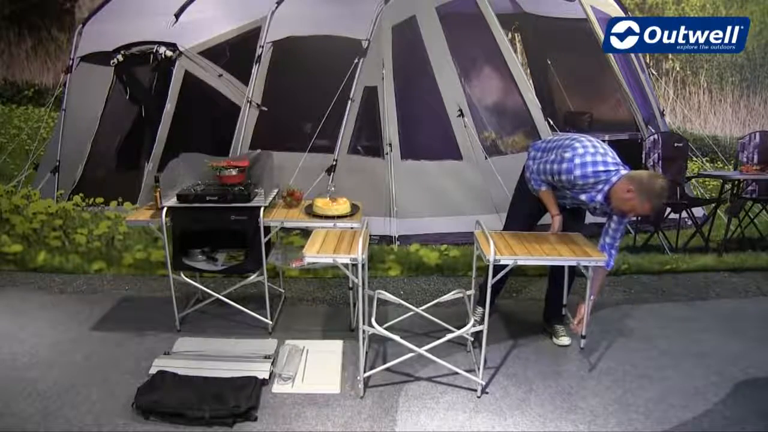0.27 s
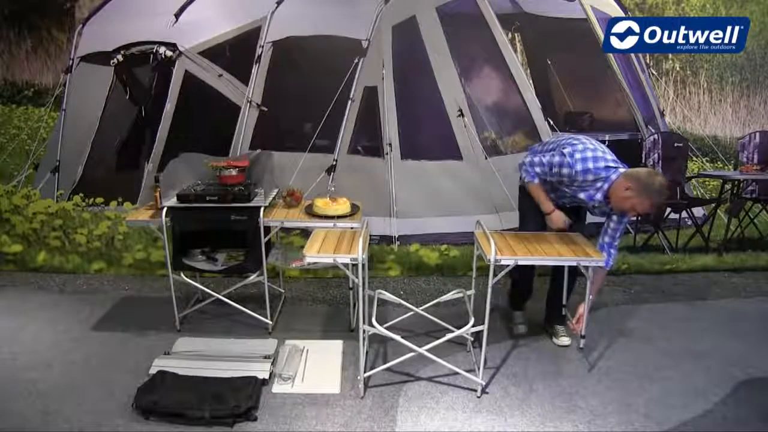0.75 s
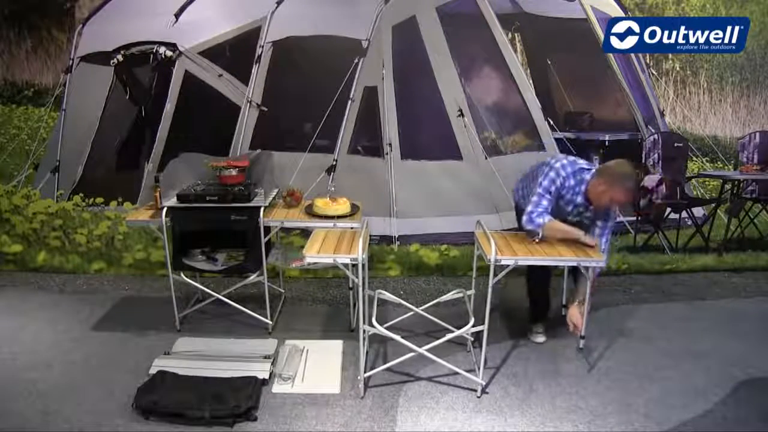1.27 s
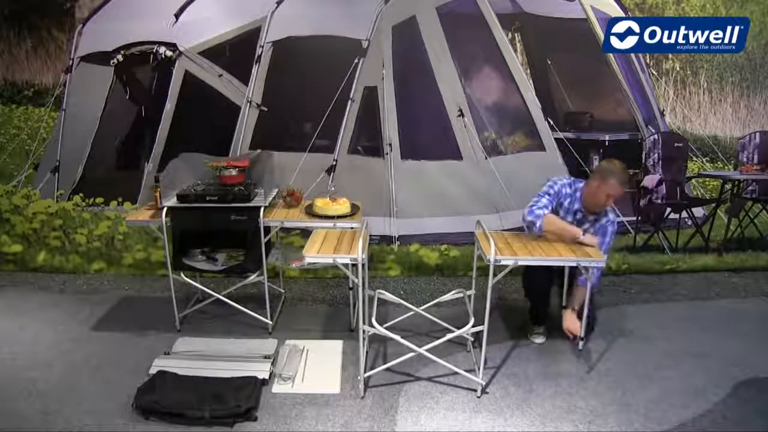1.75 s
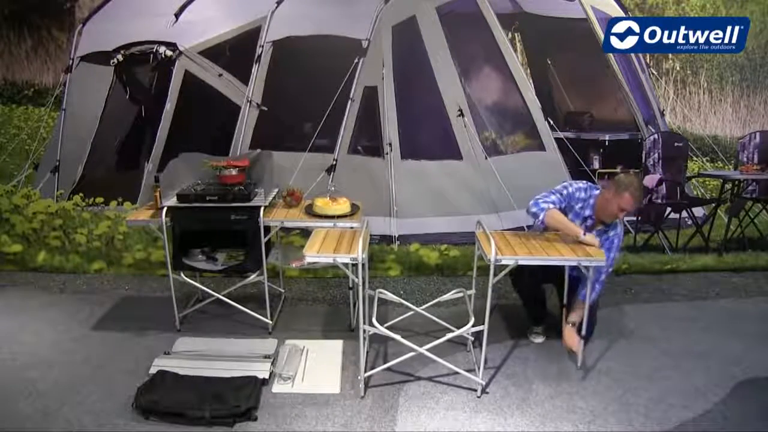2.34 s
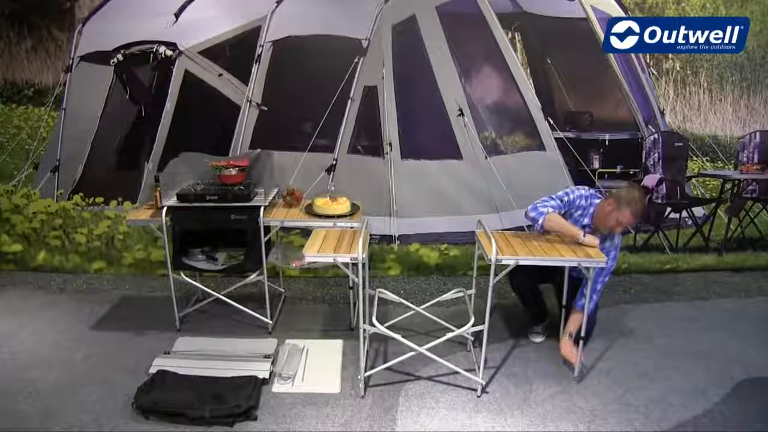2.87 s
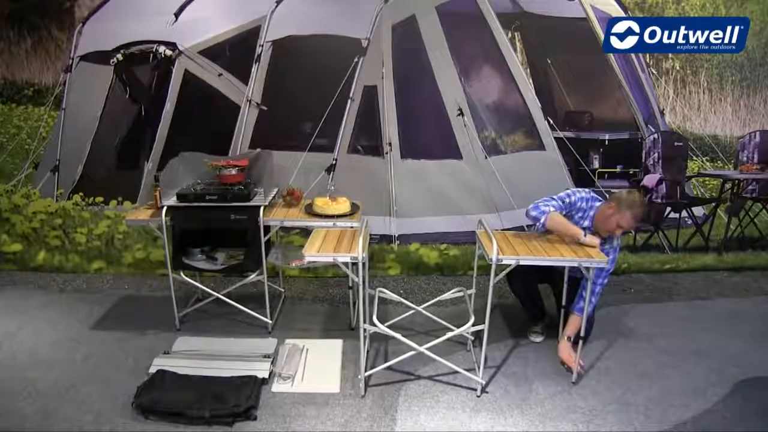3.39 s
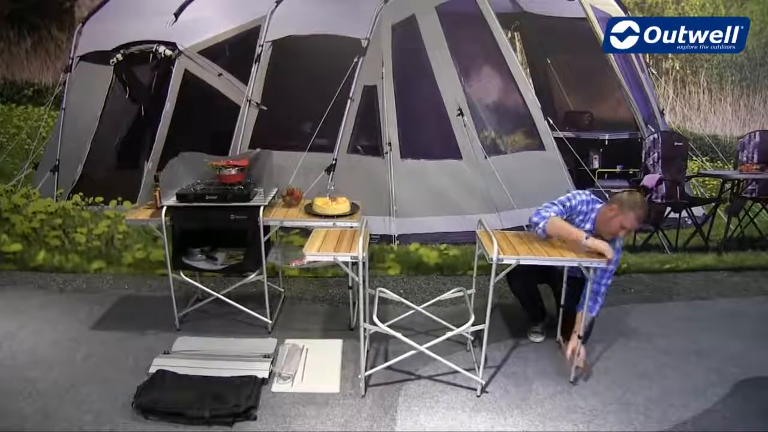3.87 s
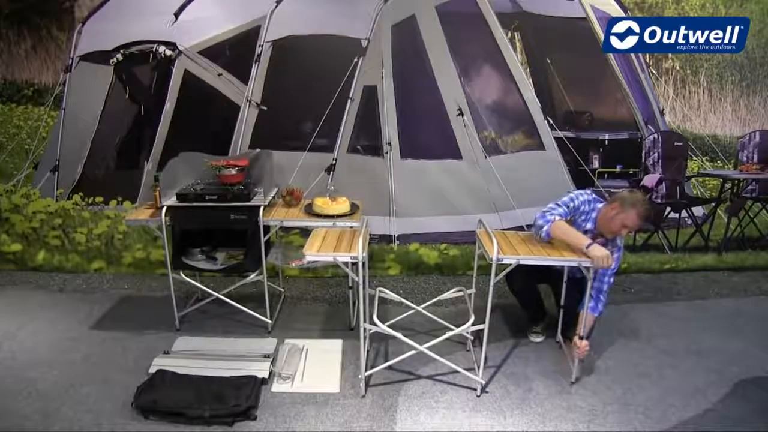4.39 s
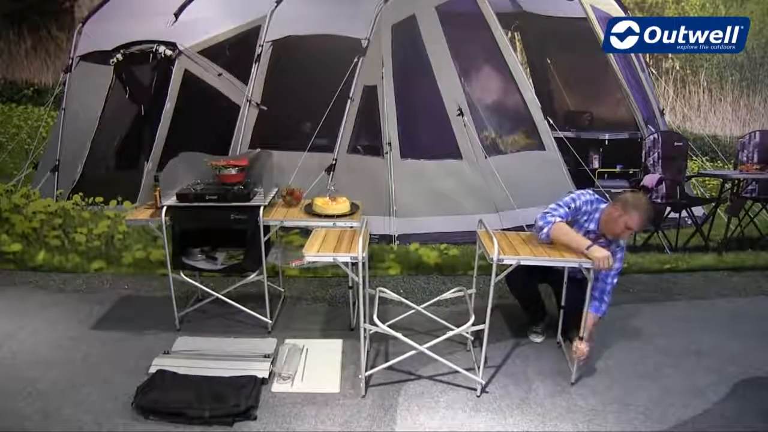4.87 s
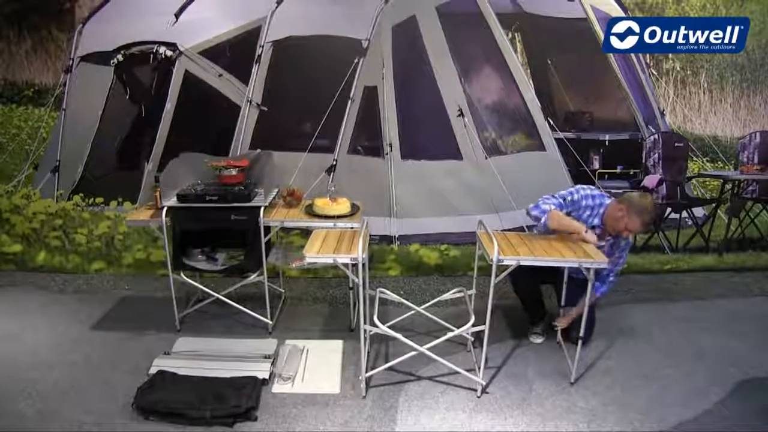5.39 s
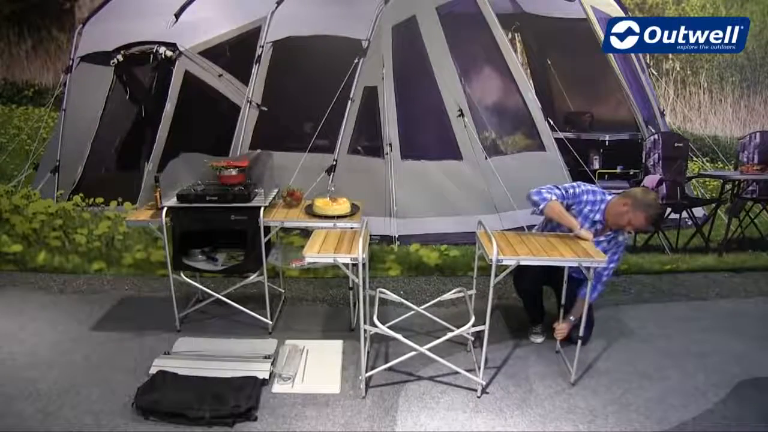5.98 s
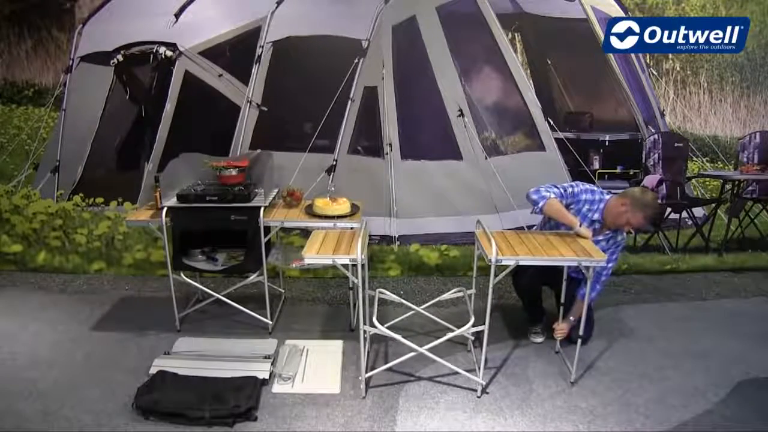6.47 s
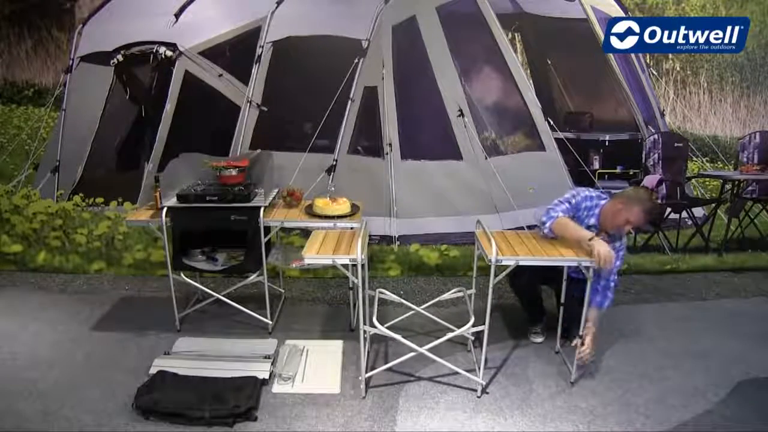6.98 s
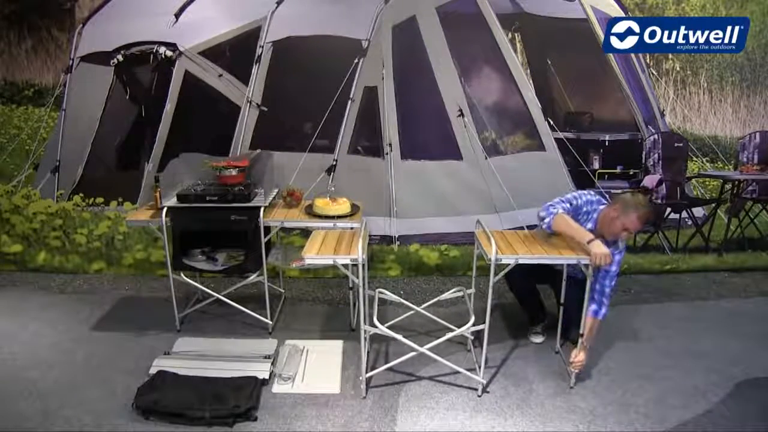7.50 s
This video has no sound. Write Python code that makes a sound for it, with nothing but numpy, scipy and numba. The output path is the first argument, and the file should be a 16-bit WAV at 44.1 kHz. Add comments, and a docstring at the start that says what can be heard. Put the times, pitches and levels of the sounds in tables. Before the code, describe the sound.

Aluminium table leg being pulled and locked: loose clicks, a tiny squeak, rough stick-slip scraping, dull knocks, faint cloth rustle over low room hush.

```python
"""A folding aluminium table in a small studio, over a steady hush and changing rustles of cloth and hands.
From the start its leg catches click and rattle: bursts of contact noise, each with a ring of the leg.
Before one second a brief squeak sounds on one pitch; then feet scrape the floor and slide in their tubes
(stick-slip grit through resonances), and shoes and feet knock softly on the floor (sagging low thuds).
A short room answers clicks, squeak, scrapes and knocks; the microphone adds a low swing to sharp treble."""
import sys
import numpy as np
from scipy import signal
from scipy.fft import rfft, irfft
from scipy.io import wavfile
from scipy.ndimage import uniform_filter1d
from numba import njit

SR = 44100
rng = np.random.default_rng(int(sys.argv[2]) if len(sys.argv) > 2 else 0)


def output_pcm(signal):
    """Save a mono or channel-first signal as 16-bit PCM at the path in sys.argv[1].

    Samples are clipped to [-1, 1] before scaling.
    """
    pcm = np.clip(np.atleast_2d(signal).T, -1, 1) * 32767
    wavfile.write(sys.argv[1], SR, np.round(pcm).astype(np.int16))


N = 341334  # length in samples


def undb(db):
    """Turns decibels into a plain gain."""
    return 10 ** (np.asarray(db) / 20)


def unit(x):
    """Scales a sound to an average (RMS) level of 1."""
    return x / np.sqrt(np.mean(x ** 2))


def peaked(x):
    """Scales a sound to a peak of 1."""
    return x / np.max(np.abs(x))


@njit
def svf(x, hz, width):
    """State-variable band-pass, gain 1 at a centre that may move."""
    y = np.empty(len(x))
    band_state, low_state, g = 0., 0., 0.
    for i in range(len(x)):
        if i == 0 or hz[i] != hz[i - 1]:
            g = np.tan(np.pi * hz[i] / SR)
        k = width[i] / hz[i]
        v = (band_state + g * (x[i] + 1e-18 - low_state)) / (1 + g * (g + k))
        band_state = 2 * v - band_state
        low_state = low_state + 2 * g * v
        y[i] = k * v
    return y


def band(x, hz, width_hz):
    """Keeps one band of a sound, with centre and width held in a safe range."""
    centre = np.clip(hz, 10, .45 * SR) + 0. * x
    width = np.maximum(width_hz, 5) + 0. * x
    return svf(x, centre, width)


def steep(x, hz, width_hz):
    """Filters twice for steeper sides, then sets the average level to 1."""
    return unit(band(band(x, hz, width_hz), hz, width_hz))


def fade(t, t60):
    """Dies away by 60 dB in t60 seconds."""
    return np.exp(-np.log(1000) * t / t60)


def add(out, s, sound):
    """Mixes a sound in at a time in seconds."""
    i = int(s * SR)
    out[i:i + len(sound)] += sound[:N - i]


def walk(rate):
    """A random curve that glides to a new value about rate times a second; spread near 1."""
    k = int(SR / rate)
    steps = np.repeat(rng.standard_normal(N // k + 1), k)
    return 1.2 * uniform_filter1d(steps, k)[:N]


def grit(rate, spread_db):
    """Slips at random moments, rate of them a second on average, a few much larger than the rest."""
    chance = rng.random((3, N))
    happens = chance[0] < rate / SR
    direction = np.sign(chance[1] - .5)
    size = undb(-spread_db * np.log(1 - chance[2]))
    return unit(happens * direction * size)


def air():
    """The steady hush of the studio: noise shaped to a fixed balance of pitches."""
    # colour of the hush: pitch_hz [Hz], level_db [dB per Hz, relative]
    hush = [(12, -30), (20, -12), (69, 7.5), (325, -6), (515, -5), (1330, -23), (3330, -21.5),
            (10400, -29.5), (11900, -32.5), (12900, -59), (16800, -90), (22000, -120)]
    hz, db = np.transpose(hush)
    f = np.maximum(np.arange(N // 2 + 1) * SR / N, 1)
    colour = undb(np.interp(np.log(f), np.log(hz), db))
    noise = irfft(rfft(rng.standard_normal(N)) * colour, N)
    return undb(-64.5) * unit(noise)


def rustle():
    """Cloth and hands: soft grains, dull with a thin crackle on top."""
    # rustle over time, gliding between rows: time_s [s], level_db [dB],
    # treble_db [dB relative to level_db]
    cloth = [(0, -73.5, 18.5), (.2, -86, -33), (.37, -70.5, 3.5), (.68, -70, -13), (.81, -65, -14),
             (1.25, -60, -5), (1.6, -70, -2.5), (1.82, -55, -19), (2.05, -63.5, -10), (2.95, -48.5, -27),
             (3.2, -80, -23), (3.5, -63.5, -23), (3.86, -59.5, -23), (4.3, -65, -1), (4.55, -73, -28),
             (4.89, -66.5, -18), (5.0, -54, -32), (5.15, -68.5, 0.5), (5.75, -66, -21), (6.05, -58, -14),
             (6.42, -60, -6.5), (6.7, -69, -9), (7.072, -70.5, -5), (7.25, -64, -4.5), (7.74, -72.5, 1.5)]
    s, db, treble_db = np.transpose(cloth)
    t = np.arange(N) / SR
    dull = steep(grit(3000, 1.5) * undb(2.5 * walk(40)), 520, 1000)
    crackle = steep(grit(3400, 1.5), 3400, 13500)
    mix = dull + undb(np.interp(t, s, treble_db)) * crackle
    return undb(np.interp(t, s, db)) * mix


def clicks():
    """A short rattle of contact noise, brightest where the parts meet; loose joints keep the leg's ring rough."""
    # metal on metal: start_s [s], treble_peak_db [dB], mid_db [dB relative to treble peak],
    # bright_hz [Hz], mid_hz [Hz], rattle_t60_s [s], ring_db [dB relative to treble peak]
    catches = [(0.144, -35, -16, 3350, 560, 0.078, -19), (0.293, -34, -9, 5250, 583, 0.057, -22),
               (0.385, -44, -15, 3420, 570.0, 0.079, -21), (0.502, -36.5, -13, 3380, 600, 0.051, -27),
               (0.513, -38.0, -8, 3410.0, 560, 0.047, -20.5), (0.586, -39.5, -5.5, 3370, 490, 0.044, -17.5),
               (0.664, -52.5, -12, 8760.0, 560, 0.1, -15.5), (0.774, -55.5, 7.5, 2480, 500.0, 0.081, -27),
               (0.817, -60, 12.5, 2510.0, 780, 0.089, -21), (0.908, -66, 12, 2580.0, 730.0, 0.044, -15),
               (0.978, -49, 1, 2500, 543, 0.033, -23), (1.097, -31, -20, 3510, 1920, 0.058, -21),
               (1.245, -35.5, -4, 3300, 523, 0.037, -22), (1.688, -57, -2, 3330, 510.0, 0.083, -8),
               (1.75, -52.5, 4, 4570, 543, 0.042, -27), (1.781, -26.5, -18, 4580, 1600, 0.012, -28.5),
               (1.787, -24, -7, 6150, 670, 0.022, -30.5), (1.804, -37, -5, 4910.0, 660, 0.048, -34),
               (1.828, -43, -7, 4940.0, 690.0, 0.033, -30), (1.841, -37, -18, 4880.0, 1040.0, 0.031, -28),
               (1.862, -21.5, -15, 8840, 1060, 0.024, -33), (1.888, -24.5, -8, 4730, 650.0, 0.028, -27),
               (1.903, -40.5, 2, 4620.0, 605, 0.031, -15), (1.919, -35, -8, 4300, 630, 0.05, -18.5),
               (1.966, -47.5, 14, 3450, 896, 0.026, -36), (2.098, -38, 2, 6600, 676, 0.045, -16.5),
               (2.168, -22.5, 7, 6840.0, 980, 0.044, -30), (2.227, -37, 9, 3300, 545, 0.048, -23),
               (2.313, -37.5, 3, 3340, 554, 0.017, -27), (2.436, -36, 8, 2510.0, 575, 0.028, -25),
               (2.582, -35, 7, 3290.0, 406, 0.024, -11), (2.623, -36, 4, 2660, 515, 0.042, -29),
               (2.68, -26, -7, 6400, 1160, 0.017, -18), (2.697, -32, 4, 6740, 1130, 0.02, -11),
               (2.749, -32.5, 5, 6910.0, 594, 0.036, -31), (2.81, -29.5, 5.5, 2540, 1260, 0.022, -28),
               (2.858, -35, 6.5, 2510.0, 523, 0.022, -18), (2.896, -38, 6, 6860.0, 870, 0.024, -28),
               (2.953, -37, 4, 2870.0, 640, 0.034, -24), (2.978, -54.5, 13.5, 2680, 2380, 0.051, -24),
               (3.017, -40.0, 0, 2600, 700, 0.027, -27), (3.041, -49, 6, 2530, 690.0, 0.025, -22),
               (3.079, -33.5, 2.5, 8150, 800, 0.017, -12.5), (3.103, -25.5, 4, 2570.0, 954, 0.027, -26),
               (3.119, -18, -27, 6470.0, 510, 0.014, -25), (3.147, -45.5, 14, 2510.0, 555, 0.017, -24),
               (3.168, -43.5, 9, 2540, 2300, 0.054, -21), (3.305, -44.5, 2, 2510.0, 810, 0.038, -24),
               (3.315, -35.5, -2, 2970, 690, 0.019, -15), (3.325, -38.0, 5, 5100.0, 567, 0.035, -24),
               (3.357, -31.5, 5.5, 2540, 546, 0.038, -31), (3.378, -14.5, -8.5, 6800, 2430, 0.026, -32),
               (3.415, -54.5, 18, 2890.0, 720.0, 0.034, -12), (3.54, -32, -3, 2960, 2120, 0.041, -26),
               (3.544, -30, -3, 2500, 1970.0, 0.019, -24), (3.552, -29.5, -4.5, 3120, 2430, 0.023, -24),
               (3.596, -30, -1, 7470, 1040, 0.039, -27), (3.667, -41.5, 7.5, 3100, 2210, 0.024, -22),
               (3.74, -41.5, -6, 3440, 2110.0, 0.044, -22), (3.759, -22.5, -4, 5340, 1950, 0.028, -22.5),
               (3.767, -22.5, -7.5, 7260, 2170, 0.025, -39), (3.83, -21, -8, 8450, 2360, 0.02, -29),
               (3.849, -40, 8, 3240, 420, 0.028, -33), (3.92, -33.5, -22, 3270, 1920, 0.054, -15.5),
               (4.041, -58.5, 14, 2660, 2200, 0.089, -18), (4.063, -61, 18, 2540, 2270, 0.032, -9),
               (4.146, -60, 19, 2670, 2500, 0.047, -11), (4.188, -66, 3.5, 2590, 2420, 0.047, -18),
               (4.225, -50, 17.5, 2650, 2420, 0.02, -27), (4.244, -32, -5, 3280, 1900, 0.033, -33),
               (4.256, -36, -4, 2490, 1970.0, 0.036, -19.5), (4.281, -35.5, -5, 3400, 1970.0, 0.034, -33),
               (4.299, -38.5, -6, 3400, 1970.0, 0.049, -16), (4.321, -53, 1, 3270.0, 1940.0, 0.034, -24),
               (4.355, -30.5, -5, 6800, 2500, 0.018, -44), (4.41, -63, 20, 2510.0, 1900, 0.043, -26),
               (4.423, -30, -0.5, 8260, 2030.0, 0.021, -20.5), (4.447, -34.5, 2, 3300, 1960, 0.03, -27),
               (4.663, -45.5, 3, 4770, 1580, 0.04, -11.5), (4.716, -50, 8.5, 3100, 1200, 0.018, -22),
               (4.743, -52, 12, 3230, 2240, 0.025, -16), (4.758, -26, 1, 3220, 470, 0.034, -31),
               (4.921, -41, 8, 3530, 750, 0.04, -31), (4.945, -37.5, 2.5, 3220.0, 445, 0.035, -26),
               (4.975, -31, -1, 7840, 485, 0.022, -18.5), (5.003, -26, -7, 3050, 2140, 0.044, -23),
               (5.011, -21.5, -6.5, 8470.0, 1600.0, 0.02, -39),
               (5.145, -35.5, -12.5, 3090, 724, 0.039, -20.5), (5.289, -37, -0.5, 8250, 1970.0, 0.056, -20),
               (5.56, -38.5, -4.5, 3280, 1970, 0.056, -17), (5.616, -30, -4.5, 3270, 1910, 0.027, -29),
               (5.625, -31.5, 3, 5600, 504, 0.048, -27), (5.667, -45.5, -3.5, 3300, 700.0, 0.03, -16),
               (5.767, -48.5, 8.5, 5950, 526, 0.024, -20), (5.828, -40.5, 3, 2500, 706, 0.025, -5.5),
               (5.899, -33, 5, 3420, 1130, 0.093, -16), (6.015, -29, -3.5, 6870, 1330, 0.018, -28),
               (6.063, -23, -9, 5720, 1370, 0.019, -26.5), (6.1, -25, -9, 11380, 1230, 0.02, -32),
               (6.167, -44.5, -2, 2900, 1060.0, 0.077, -17), (6.222, -28.5, -3, 11440, 1900, 0.031, -26.5),
               (6.306, -29.0, -5, 5350, 1880, 0.042, -29.5), (6.343, -46, 3.5, 5280.0, 1970.0, 0.039, -20),
               (6.376, -34.5, -21, 8460.0, 705, 0.038, -20.5), (6.43, -20, -11, 4250.0, 1480.0, 0.04, -24),
               (6.442, -13.5, -4, 4230, 710, 0.02, -25.5), (6.705, -35.0, -3, 3260.0, 1940, 0.033, -22),
               (6.756, -53, 14, 3070, 1110, 0.089, -17), (6.784, -50.5, 10.5, 3270, 1900, 0.064, -6),
               (7.197, -28, 1.5, 3350, 1960, 0.017, -22), (7.204, -29.5, -7, 5500, 2040, 0.019, -25),
               (7.269, -22, -3.5, 6600, 1650, 0.021, -22), (7.322, -41, -0.5, 2520.0, 527, 0.054, -20),
               (7.355, -42, 20, 2510.0, 1560, 0.049, -14), (7.431, -12.0, 0.5, 8570, 1210, 0.021, -22.5)]
    # natural notes of the leg: pitch_hz [Hz], loose_db [dB when hanging loose],
    # locked_db [dB when locked to the floor], t60_s [s]
    leg_notes = [(522.4, 2.5, -19, 0.14), (718, -3.5, 1.5, 0.12), (1100, -5.5, -3.5, 0.13),
                 (1600, -1.5, -2.5, 0.11), (1970, 3, -19, 0.056), (2300, 2.5, -11.5, 0.04),
                 (2833, -45.5, 16.5, 0.36), (3330, 3, -49.5, 0.22), (4250, -46, -12, .12),
                 (4906, -7.5, -16, 0.26), (5540, -1.5, 12, 0.027), (6500, -27, 5, 0.069),
                 (6910, -24, -12, 0.39), (7550, -36, 10.5, 0.29), (8330, -12, -30, 0.25),
                 (10230, -1, -3, 0.043)]
    # how the leg is held, gliding between rows: time_s [s], locked [0 loose - 1 locked to the floor],
    # wash_db [wash of higher notes, dB]
    leg_hold = [(0, 0.04, 3), (1.3, 0.24, -19), (1.8, 0.27, -6), (2.05, 0.54, -10), (3.0, 0.27, -8.5),
                (3.8, 0.56, -1), (4.7, 0.14, -12), (5.2, 0.19, -2), (5.6, 0.3, -0.5), (6.3, 0.06, -7),
                (6.43, 0.62, -6.5), (6.7, 0.19, -5), (7.43, 0.13, -9)]
    focus = 0.56  # share of the mid band on its resonance, 0-1
    out, t = np.zeros(N), np.arange(SR // 4) / SR
    hz, loose_db, locked_db, t60 = np.transpose(leg_notes)
    hold_s, hold_locked, hold_wash_db = np.transpose(leg_hold)
    # a narrow band of noise for each note makes it rough
    hum = np.array([steep(rng.standard_normal(SR), f, 60 + .02 * f) for f in hz])
    # countless higher modes of frame and slats blur into a wash
    wash = steep(rng.standard_normal(SR), 1100, 2400)
    wash += 0.3 * steep(rng.standard_normal(SR), 7200, 9000)
    decay = fade(t, t60[:, None]) * (1 - fade(t, 0.0018))
    wash_decay = fade(t, 0.42) * (1 - fade(t, 0.051))
    short = t[:SR // 12]
    for s, peak_db, mid_db, bright_hz, mid_hz, rattle_t60, ring_db in catches:
        noise = rng.standard_normal((2, len(short)))
        shape = (1 - fade(short, 0.0056)) * fade(short, rattle_t60)
        treble = steep(noise[0], bright_hz, 0.15 * bright_hz) + 1.1 * steep(noise[0], 6800, 10000)
        narrow = steep(noise[1], mid_hz, .15 * mid_hz)
        mid = focus * narrow + (1 - focus) * steep(noise[1], 935, 3300)
        rattle = peaked(shape * treble) + undb(mid_db) * peaked(shape * mid)
        add(out, s, undb(peak_db) * rattle)

        locked = np.interp(s, hold_s, hold_locked)
        wash_db = np.interp(s, hold_s, hold_wash_db)
        # each click excites the notes a little differently
        scatter_db = 2.5 * rng.standard_normal(len(hz))
        mix = undb(loose_db + locked * (locked_db - loose_db) + scatter_db)
        start = rng.integers(SR - len(t))
        piece = slice(start, start + len(t))
        ring = mix @ (decay * hum[:, piece])
        blur = undb(wash_db) * wash_decay * wash[piece]
        add(out, s, undb(peak_db + ring_db) * (ring + blur))
    return out


def squeak():
    """A rubber foot or sole sticks and slips on one pitch for a moment: a narrow band of noise."""
    # brief squeaks: start_s [s], level_db [dB], pitch_hz [Hz], t60_s [s]
    squeaks = [(0.766, -48, 2300, 0.06)]
    out, t = np.zeros(N), np.arange(SR // 12) / SR
    for s, db, hz, t60 in squeaks:
        shape = (1 - fade(t, 0.026)) * fade(t, t60)
        add(out, s, undb(db) * shape * steep(rng.standard_normal(len(t)), hz, 100))
    return out


def scrapes():
    """Dense stick-slip drives two resonances of leg and floor, the tube's high notes, a hiss and a rumble."""
    # strokes of dragging and sliding: full_level_s [s], rise_s [s], hold_s [s], level_db [dB],
    # treble_db, bass_db, upper_db [dB relative to level_db], low_hz [Hz],
    # upper_start_hz [Hz], upper_end_hz [Hz]
    strokes = [(0.82, 0.014, 0.022, -53, -25, 2.5, -28, 690, 1000, 950),
               (1.3, 0.041, .12, -59, -18, -3, -4, 525, 1060, 1010),
               (2.114, 0.028, 0.051, -28, -14.5, -8, -7.5, 550, 1100, 1010),
               (2.19, 0.027, 0.051, -30, -26.5, -12.5, -8.5, 535, 990, 1030),
               (2.278, 0.017, 0.053, -39.5, -20.5, -3.5, -2.5, 550, 1000, 1010),
               (2.344, 0.021, .11, -33, -18, -7, -3.5, 555, 1010, 1000),
               (2.466, 0.015, 0.089, -34, -16, -4, -2, 540, 1130, 1220),
               (2.565, .02, .07, -35.5, -20.5, -3.5, -8.5, 540, 1270, 1220),
               (2.694, 0.033, .07, -34, -17.5, -8, -5.5, 536, 1170, 1060),
               (2.808, 0.014, .025, -32.5, -21, -4.5, -3, 507, 1280, 1230),
               (2.859, 0.026, 0.027, -35, -16, -6.5, -6, 540, 1180, 1000),
               (3.098, 0.032, 0.035, -32, -20, -8, -6, 610, 1470, 1320),
               (3.36, 0.031, 0.011, -27, -20, -9, -6.5, 720, 1250, 1280),
               (3.927, 0.0091, 0.035, -45.5, -2, -25, -1.5, 660, 1870, 2000),
               (4.045, .01, 0.025, -55, -22, -18, -3, 610, 2200, 2180),
               (4.14, .01, 0.0083, -57, -20, -19, 2.5, 610, 2350, 2360),
               (4.187, 0.0055, 0.0066, -53, -27, -17, 4.5, 594, 2160, 2170),
               (4.25, .03, 0.084, -52.5, -22, -29, -0.5, 620, 2160, 1740),
               (4.55, 0.017, 0.018, -51.5, -21, -8, -6, 570, 1840, 1720),
               (4.985, .02, 0.042, -49, -30, -8, -5.5, 610, 1960, 1850),
               (5.834, .03, .045, -35, -12, -5.5, -2, 470, 1620, 1380),
               (5.898, 0.09, 0.045, -39, -22, -2.5, -1, 570, 1160, 1180),
               (6.045, 0.075, 0.019, -49, -17, -2.5, -0.5, 470, 1380, 1440),
               (7.335, 0.048, 0.018, -42, -15, 2.5, 1, 620, 1440, 1470),
               (7.371, 0.027, 0.011, -27, -18.5, -8.5, -1.5, 640, 1470, 1540)]
    # high notes of the tube: pitch_hz [Hz], width_hz [Hz], level_db [dB, relative]
    tube_notes = [(3260, 180, 9), (4740, 200, -23), (6700, 150, 13), (6955, 190, 16), (7400, 150, -6),
                  (8890, 250, -18)]
    edge_db, lift_db_per_s = -37, 603  # level where a stroke begins, speed of its fall after the hold
    out = np.zeros(N)
    slips = grit(8000, 1.5) * undb(1.2 * walk(70))
    fine = grit(6000, 1.5) * undb(1.8 * walk(120))
    notes = sum(undb(db) * steep(fine, hz, width) for hz, width, db in tube_notes)
    flickering_notes = unit(notes * undb(6 * walk(30)))
    hiss = unit(steep(fine, 6500, 9000) + .5 * flickering_notes)
    broad = steep(band(slips, 1300, 2600), 1380, 2000)
    rumble = steep(slips, 321, 490)
    for s, rise, hold, db, treble_db, bass_db, upper_db, low_hz, from_hz, to_hz in strokes:
        t = np.arange(-rise, hold + .1, 1 / SR)  # zero at full level
        first = int((s + t[0]) * SR)
        now = slice(first, first + len(t))
        shape_db = edge_db * np.clip(t / t[0], 0, 1) - lift_db_per_s * np.maximum(t - hold, 0)
        high_hz = np.interp(t, [0, hold], [from_hz, to_hz])
        peak = steep(slips[now], high_hz, .28 * high_hz)
        lower = 0.41 * steep(slips[now], low_hz, 0.37 * low_hz)
        upper = undb(upper_db) * unit(peak + broad[now])
        sound = lower + upper + undb(treble_db) * hiss[now] + undb(bass_db) * rumble[now]
        add(out, s + t[0], undb(db + shape_db) * sound)
    return out


def knocks():
    """A soft push into the floor: a thud that starts high and sags at once to the body's pitch."""
    # shoes and feet on the floor: start_s [s], level_db [dB], t60_s [s]
    steps = [(0.981, -41, 0.081), (1.0089, -27.5, 0.044), (1.254, -45, 0.078), (1.541, -41.5, 0.054),
             (1.68, -47.5, 0.12), (1.75, -40.5, 0.033), (1.966, -23, 0.031), (2.696, -36, 0.2),
             (6.443, -34.5, 0.11), (7.324, -34.5, 0.068), (7.37, -31, 0.068), (7.393, -33.5, 0.11),
             (7.431, -33, 0.12)]
    body_hz = 84
    out, t = np.zeros(N), np.arange(SR // 4) / SR
    # the extra term runs the wave ahead at first, which raises the pitch
    body = np.sin(2 * np.pi * body_hz * (t + 0.014 * (1 - np.exp(-t / 0.0029))))
    for s, level_db, t60 in steps:
        scuff = 0.26 * steep(rng.standard_normal(len(t)), 520, 410) * fade(t, 1.74 * t60)
        add(out, s, undb(level_db) * (1 - fade(t, 0.0055)) * (body * fade(t, t60) + scuff))
    return out


def room(x):
    """A diffuse tail of noise that swells in briefly; each band dies away at its own speed."""
    # how long the room rings: pitch_hz [Hz], t60_s [s]
    echo_times = [(100, 1), (500, 0.32), (2000, 0.42), (5000, 0.12), (11000, 0.13)]
    t = np.arange(SR // 2) / SR
    tail = sum(band(rng.standard_normal(len(t)), hz, hz) * fade(t, t60) for hz, t60 in echo_times)
    tail = tail * (1 - fade(t, 0.03))
    return signal.fftconvolve(x, tail / np.sqrt(np.sum(tail ** 2)))[:N]


def scene():
    """Adds the room to the table and shoe sounds, then lays rustle and air beside them."""
    near = clicks() + squeak() + scrapes() + knocks()
    room_db = -19.5
    return (near + undb(room_db) * room(near) + rustle() + air())[None]


def record(dry):
    """Sharp treble is partly rectified at the microphone and comes out as a slow swing; the top is cut."""
    swing_hz, swing_width_hz, swing_db, swing_power = 29.7, 59, -11.5, 0.66
    treble = uniform_filter1d(np.abs(band(dry[0], 7500, 9000)), 64)
    pushed = band(treble ** swing_power, swing_hz, swing_width_hz)
    pushed = band(pushed, swing_hz, 3 * swing_width_hz)
    # the swing leads with a dip: a copy about 10 ms late, minus the level now
    swing = np.roll(pushed, 440) - pushed
    # two low-pass filters, with edges in Hz
    edge = signal.cheby1(8, .5, 11630, fs=SR, output="sos")
    top = signal.ellip(10, .5, 70, 13000, fs=SR, output="sos")
    return signal.sosfilt(top, signal.sosfilt(edge, dry + undb(swing_db) * swing))


dry = scene()
out = record(dry)
output_pcm(out)
```